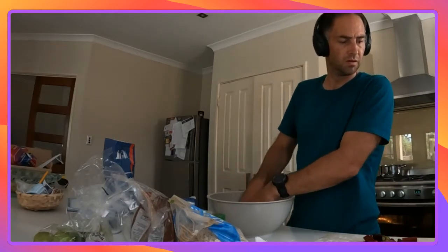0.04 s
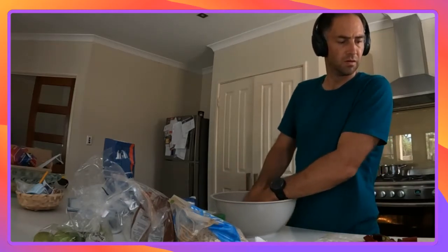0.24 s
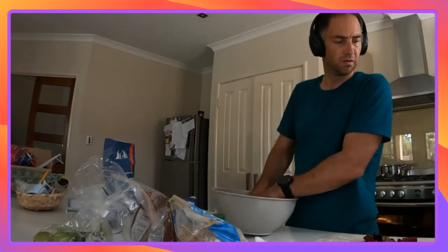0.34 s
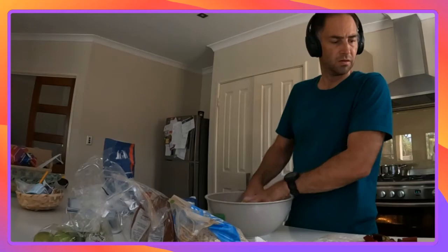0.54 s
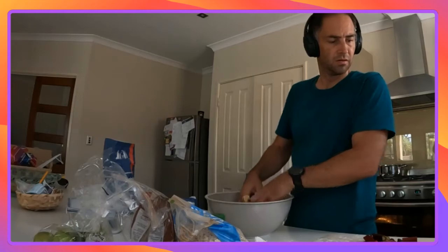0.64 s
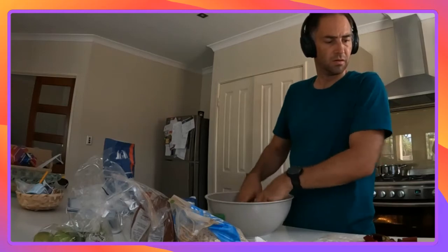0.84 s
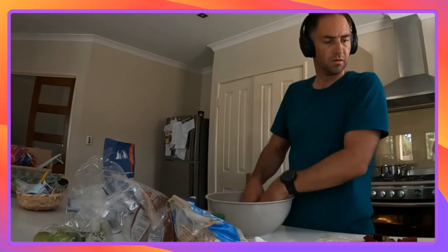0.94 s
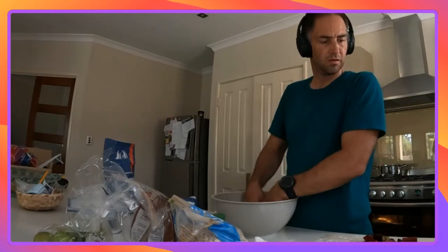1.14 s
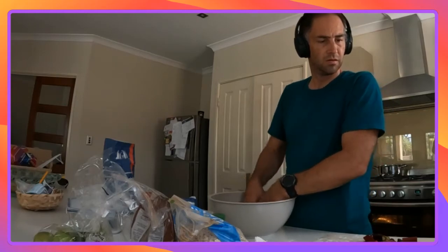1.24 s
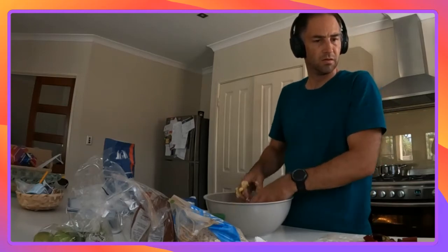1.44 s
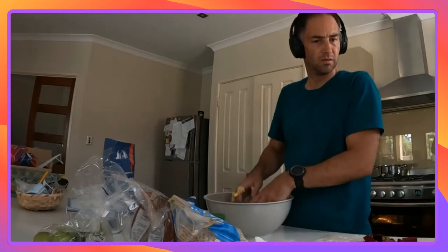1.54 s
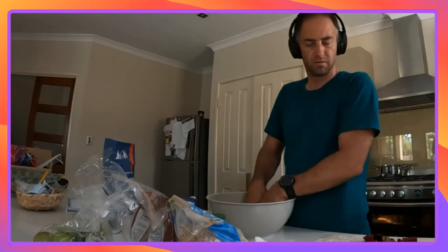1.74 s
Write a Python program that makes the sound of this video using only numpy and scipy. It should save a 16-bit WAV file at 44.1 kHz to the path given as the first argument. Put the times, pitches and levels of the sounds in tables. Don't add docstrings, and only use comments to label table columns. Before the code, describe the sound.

Hollow, woody bowl knocks in a hard-surfaced kitchen, two close together with the second loudest and slightly overloaded, then faint gritty rubbing and one softer thud over low room hum, heard through a dull small microphone.

```python
import sys
import numpy as np
from scipy import signal
from scipy.fft import rfft, irfft
from scipy.io import wavfile
from scipy.ndimage import uniform_filter1d

SR = 44100
rng = np.random.default_rng(int(sys.argv[2]) if len(sys.argv) > 2 else 0)


def volts_from_decibels(level):
    exponent = np.asarray(level, float) / 20
    return 10 ** exponent


def dump(signal):
    limited = np.clip(np.atleast_2d(signal).T, -1, 1)
    pcm = np.round(limited * 32767).astype(np.int16)
    wavfile.write(sys.argv[1], SR, pcm)


N = 79380

# frequency_hz, level_db
HUM_SPECTRUM = [(50, -31.5), (90, 2.5), (600, -8), (1000, -11), (1600, -14.5), (2900, -15), (4500, -22.5),
                (6500, -10)]
# pitch_hz, width_hz, level_db
APPLIANCE_TONES = [(137, 17, -74), (610, 41, -77.5), (967, 40, -75)]
# frequency_hz, t60_s
KITCHEN_T60 = [(120, 0.47), (320, 0.37), (840, 0.39), (2210, 0.46), (5820, 0.42)]

# time_s, pressure_db, fine_dry_hiss_share (0-1)
RUBS = [
    [(0, -45.5, 0.13), (.03, -57.5, 0.25), (.1, -66, 0.56), (.22, -82, .7)],
    [(.76, -67.5, 0.17), (.815, -57, 0), (.83, -49.5, 0), (.865, -44.5, 0.27), (.894, -44.5, 0.48),
     (.91, -52.5, 0.53), (.93, -61, 0.72), (.98, -66, 0.34)],
    [(.98, -67, 0.92), (1.01, -61, 0.54), (1.075, -54.5, 0.56), (1.125, -57, 0.25), (1.16, -77, 0.98)],
    [(1.47, -73.5, 0.06), (1.52, -57.5, 0.22), (1.6, -57, 0.07), (1.625, -58, 0), (1.64, -76, 0.27),
     (1.72, -78, 0.14)],
]
# pitch_hz, width_hz, level_db
RUBBED_WALLS = [
    [(660, 110, 5), (1770, 190, 6), (2414, 600, 4.5), (2900, 300, 5), (4020, 1300, -6.5)],
    [(950, 150, -27.5), (1966, 250, -2), (2373, 440, -1), (2470, 1000, 6.5), (2950, 700, 5.5),
     (3830, 2700, -2)],
    [(1001, 120, -14), (2150, 410, 1.5), (1600, 230, -3), (3125, 640, 1), (4364, 1600, -4)],
    [(1140, 350, -2), (1800, 250, -5.5), (2040, 800, -1), (2930, 610, -4.5), (3757, 740, -16.5)],
]
# pitch_hz, width_hz, level_db
FLOUR_DUST = [(6100, 480, -18.5), (6130, 440, -13.5), (6480, 820, -6.5)]

# start_s, level_db, stretch (decay time
# as a multiple of the kitchen's), rise_s
BOUNCES = [
    (0.344, -17, 0.48, 0.023),
    (.425, -13.5, 0.85, 0.0013),
    (.6, -24, 0.31, 0.017),
    (1.138, -20.5, 0.15, 0.0058),
    (1.215, -29.5, 0.15, 0.0014),
    (1.33, -48.5, 0.39, .01),
]
BOUNCE_COLOUR = [1, 1, 2, 1, 2, 2]
# start_s, pitch_hz, level_db, t60_s
RIM_TAPS = [(0.2453, 490, -20.5, 0.059), (.248, 1840, -21, .02), (0.252, 1600, -15, 0.033),
            (.281, 570, -13, 0.015), (.288, 2520, -23, 0.018), (.292, 583, -14, 0.022),
            (0.297, 1490, -23, 0.022), (0.305, 303, -18.5, .08), (0.321, 549, -14.5, .06),
            (.329, 323, -21.5, .1), (.345, 538, -23, .1), (.365, 276, -21, .1), (.375, 540, -24, .08),
            (.36, 1763, -27.5, 0.026), (.3955, 950, -12.5, 0.063), (.404, 750, -11.5, .04),
            (.414, 880, -27, 0.031), (0.424, 2600, -10, 0.032), (.441, 702, -6.5, 0.076),
            (.48, 604, -5.5, 0.049), (.541, 760, -14, 0.023), (.572, 1016, -26.5, 0.063),
            (1.1272, 485, -31.5, 0.041), (1.1345, 595, -21, 0.049), (1.137, 1640, -22, 0.025),
            (1.147, 780, -31.5, 0.037), (1.156, 1600, -25, .015), (1.17, 1770, -37, 0.015),
            (1.204, 1900, -37, 0.033), (1.214, 555, -21.5, 0.057), (1.226, 510, -29, 0.028),
            (1.256, 520, -37, 0.0354), (1.36, 656, -53, .05), (1.48, 534, -47.5, .05),
            (1.5, 290, -46, 0.056), (1.514, 542, -38.5, 0.039)]

# start_s, ring_db, crack_db, tail_db, ring_rise_s
KNOCKS = [
    (0.2334, -14, -21, -13.5, 0.025),
    (0.392, -8, -6.5, -6, 0.004),
    (1.127, -17, -25, -21.5, 0.035),
    (1.478, -45.5, -54, -45.5, 0.014),
]
# pitch_hz, level_db, t60_s
KNOCK_MODES = [
    [(133, -19, 0.41), (256.6, -7, 0.24), (337.8, 7.5, 0.18), (408.7, -1.5, 0.13), (530, 5.5, 0.2),
     (577, -9.5, 0.38), (682.5, -8.5, 0.11), (900, -7.5, 0.048), (902, -10.5, 0.19), (1047, -16, 0.19),
     (1193, -7, 0.045), (1446, -10, 0.24), (1632, -9, 0.23), (1917, -16.5, .2)],
    [(221.6, -8.5, 0.22), (335, -2, 0.33), (468.7, -1.5, 0.21), (500.6, -2.5, 0.9), (579.4, -3, 0.24),
     (616, -3.5, 0.33), (674, -9, 0.4), (768.6, -5.5, 0.29), (796.4, -10.5, 0.35), (914.2, -9.5, 0.2),
     (982.7, 1, 0.13), (1031, -4.5, 0.22), (1524, -11.5, 0.1), (1599, -11.5, 0.39)],
    [(226, 6.5, 0.14), (309, -11, 0.29), (340.6, -4, .3), (383, -1, 0.27), (427, -3.5, 0.19),
     (502, -1.5, 0.32), (537, -3.5, 0.37), (613, -2.5, 0.3), (709, -8, 0.092), (836, -16, 0.13),
     (1032, -23, 0.33), (1655, -16.5, 0.17), (1835, -20, 0.3)],
    [(288, -3, 0.13), (477, -12.5, 0.12), (512, 2.5, 0.27), (523, -2.5, 0.47)],
]
# frequency_hz, level_db
ROOM_COLOURS = [
    [(90, -33), (130, -19), (340, -5.5), (600, -15.5), (900, -22.5), (3000, -29.5), (4500, -48.5),
     (7200, -54.5)],
    [(53, -78), (90, -34.5), (296, -7.5), (628, -2.5), (1000, -11), (1280, -18), (1570, -14), (6690, -36.5),
     (7200, -32.5), (9360, -70.5), (15800, -120)],
    [(90, -28.5), (260, -7.5), (560, 1), (800, -17), (1050, -26), (1400, -25.5), (1900, -26.5),
     (7200, -43.5)],
    [(120, -12), (280, 0), (523, -2.5), (860, -15.5), (1400, -23), (2000, -32), (3100, -30), (7200, -38.5)],
]
# frequency_hz, level_db
CRACK_SPECTRA = [
    [(100, -37), (300, -4), (1200, 4.5), (3000, -13), (4500, -29), (6500, -15), (7400, -43)],
    [(110, -35), (300, -6.5), (800, 2.5), (2200, -1.5), (3500, -2.5), (5000, -13), (6500, -5.5),
     (7400, -28)],
    [(100, -43), (400, -14), (1200, -5.5), (2100, 5.5), (3200, -3.5), (4200, -10.5), (6500, -7.5),
     (7400, -24)],
    [(120, -38), (300, 8), (550, 0), (2000, -7), (7400, -26)],
]
CRACK_T60 = [0.022, 0.04, 0.037, 0.03]
# pitch_hz, level_db, t60_s
RIM_TICKS = [(1300, -49.5, .015), (2400, -4, 0.012), (2160, -21.5, 0.0081), (1900, -52, .015)]


def evened(x):
    return x / np.sqrt(np.mean(x ** 2) + 1e-20)


def read(points, hz):
    frequency, value = np.transpose(points)
    return np.interp(np.log(hz + 1), np.log(frequency + 1), value)


def add(mix, start_s, sound):
    part = mix[round(start_s * SR):][:len(sound)]
    part += sound[:len(part)]


def noise(points, size):
    gain = volts_from_decibels(read(points, np.fft.rfftfreq(size, 1 / SR)))
    return evened(irfft(rfft(rng.standard_normal(size)) * gain, size))


def resonate(x, hz, width_hz):
    r = np.exp(-np.pi * width_hz / SR)
    pole = r * np.exp(2j * np.pi * hz / SR)
    once = signal.lfilter([1 - r], [1, -pole], x)
    return 2 * signal.lfilter([1 - r], [1, -pole], once).real


def decaying_sine(hz, level_db, t60, t, phase=0):
    return volts_from_decibels(level_db - 60 * t / t60) * np.sin(2 * np.pi * (hz * t + phase))


def reverberant(x, stretch=1, rise_s=0.0043):
    hz, t, bands = signal.stft(x, SR, nperseg=256)
    decay = volts_from_decibels(-60 * t / stretch / read(KITCHEN_T60, hz)[:, None])
    tail = signal.istft(bands * decay, SR, nperseg=256)[1][:len(x)]
    return tail * (1 - np.exp(-np.arange(len(x)) / SR / rise_s))


def hum():
    hiss = volts_from_decibels(-57) * noise(HUM_SPECTRUM, N)
    tones = sum(volts_from_decibels(db) * evened(resonate(rng.standard_normal(N), hz, width))
                for hz, width, db in APPLIANCE_TONES)
    return hiss + tones


def ringing(grains, body):
    return evened(sum(volts_from_decibels(db) * resonate(grains, hz, width) for hz, width, db in body))


def rubs():
    t = np.arange(N) / SR
    grains_per_s, spread_db, wet_db = 14000, -0.4, -18.5
    grains = rng.standard_normal((2, N))
    grains = grains * (rng.random((2, N)) < grains_per_s / SR)
    grains = grains * volts_from_decibels(spread_db * rng.exponential(1, (2, N)))
    dust = ringing(grains[1], FLOUR_DUST)
    rubbing = np.zeros(N)
    for stroke, wall in zip(RUBS, RUBBED_WALLS):
        time_s, pressure_db, share = np.transpose(stroke)
        fine = np.clip(np.interp(t, time_s, share), 0, 1)
        pressure = volts_from_decibels(np.interp(t, time_s, pressure_db, -120, -120))
        rubbing += pressure * (np.sqrt(1 - fine) * ringing(grains[0], wall) + np.sqrt(fine) * dust)
    room = reverberant(rng.standard_normal(SR))
    return rubbing + volts_from_decibels(wet_db) * signal.fftconvolve(rubbing, room / np.linalg.norm(room))[:N]


def bounce(level_db, stretch, rise_s, colour):
    return volts_from_decibels(level_db) * reverberant(noise(colour, SR), stretch, rise_s)


def rim_tap(hz, level_db, t60):
    t = np.arange(SR // 5) / SR
    return (1 - np.exp(-t / 0.0012)) * decaying_sine(hz, level_db, t60, t)


def knock(ring_db, crack_db, tail_db, rise_s, modes, colour, contact, contact_t60, tick):
    t = np.arange(SR) / SR
    longest_t60, phase_scatter, contact_s = 0.42, 0.38, 0.0012
    ring = sum(decaying_sine(hz, db, min(t60, longest_t60), t, phase_scatter * rng.random())
               for hz, db, t60 in modes)
    swell = np.sin(np.pi / 2 * np.minimum(t / rise_s, 1)) ** 2
    crack = volts_from_decibels(crack_db - 60 * t / contact_t60) * noise(contact, SR)
    crack += decaying_sine(*tick, t)
    tail = np.sqrt(swell) * reverberant(noise(colour, SR))
    return volts_from_decibels(ring_db) * swell * ring + np.minimum(t / contact_s, 1) * crack + volts_from_decibels(tail_db) * tail


def scene():
    mix = rubs() + hum()
    bodies = zip(KNOCKS, KNOCK_MODES, ROOM_COLOURS, CRACK_SPECTRA, CRACK_T60, RIM_TICKS)
    for (start_s, *blow), *body in bodies:
        add(mix, start_s, knock(*blow, *body))
    for (start_s, *motion), k in zip(BOUNCES, BOUNCE_COLOUR):
        add(mix, start_s, bounce(*motion, ROOM_COLOURS[k]))
    for start_s, *ping in RIM_TAPS:
        add(mix, start_s, rim_tap(*ping))
    return mix[None]


def bass_cut(x, hz):
    return signal.sosfilt(signal.butter(2, hz, "high", fs=SR, output="sos"), x)


def limiter(x):
    threshold_db, share, lag_s, recover_db_per_s = -12, 0.37, 0.007, 43
    keep = np.exp(-1 / (lag_s * SR))
    power_db = 10 * np.log10(signal.lfilter([1 - keep], [1, -keep], x ** 2) + 1e-12)
    fall = np.arange(N) * recover_db_per_s / SR
    held_db = np.maximum.accumulate(power_db + fall, axis=1) - fall
    return x / volts_from_decibels(share * np.maximum(held_db - threshold_db, 0))


def squashed(x):
    ceiling, full_power, lag_s, hold_s = 0.86, 0.1, 0.009, 0.006
    lag = round(lag_s * SR)
    earlier = np.pad(x ** 2, ((0, 0), (lag, 0)))[:, :N]
    on = np.clip(uniform_filter1d(earlier, round(hold_s * SR)) / full_power, 0, 1)
    return (1 - on) * x + on * x / (1 + (x / ceiling) ** 4) ** 0.25


def ragged(x):
    mean_hz, flicker_hz, slope_hz = 7077, 170, 130
    hz, t, bands = signal.stft(x, SR, nperseg=512)
    edge_hz = mean_hz + flicker_hz * np.repeat(rng.standard_normal(len(t)), 2)[:len(t)]
    loss_db = 20 * np.clip((hz[:, None] - edge_hz) / slope_hz, 0, 4)
    return signal.istft(bands * volts_from_decibels(-loss_db), SR, nperseg=512)[1][:, :N]


def low_pass(x):
    return signal.sosfilt(signal.butter(12, 16000, fs=SR, output="sos"), x)


def record(dry):
    x = bass_cut(dry, 96)
    x = x - 0.36 * resonate(x, 1301, 380)
    band_limit = signal.firwin(241, 7700, window=("kaiser", 9), fs=SR)
    x = signal.oaconvolve(x, band_limit[None], "same")
    x = squashed(volts_from_decibels(1.59) * limiter(x))
    x = ragged(bass_cut(x, 107))
    return low_pass(np.clip(x, -0.995, 0.995))


dry = scene()
out = record(dry)
dump(out)
```